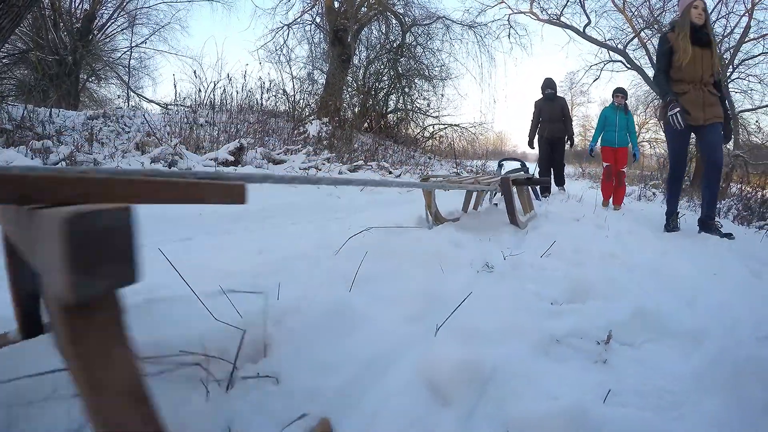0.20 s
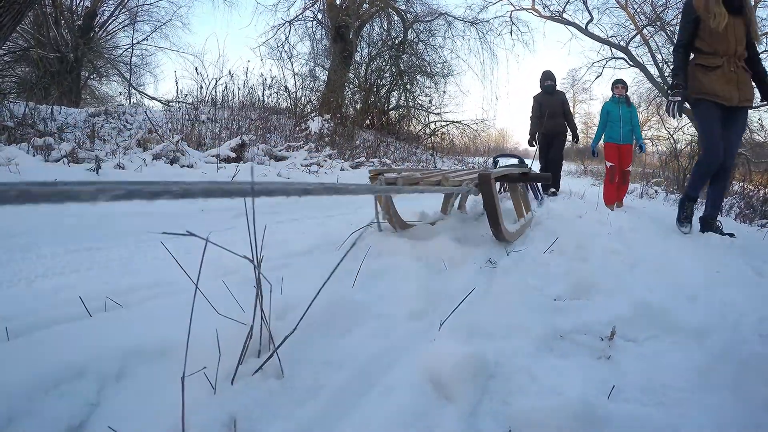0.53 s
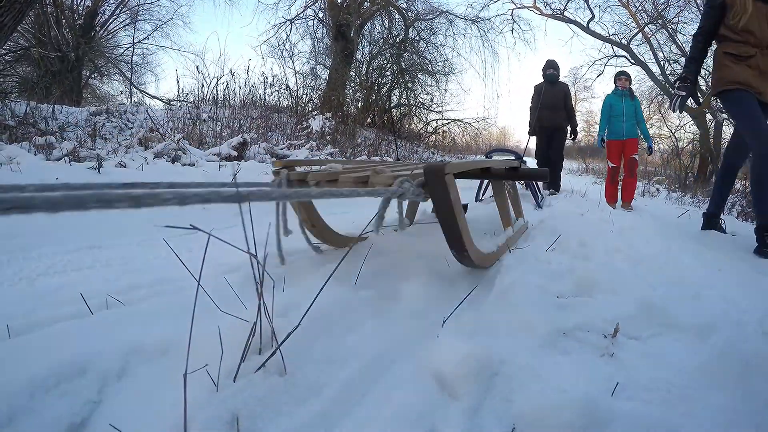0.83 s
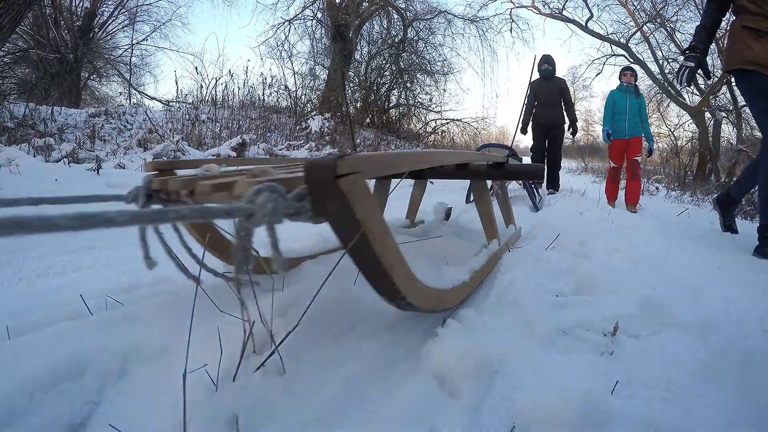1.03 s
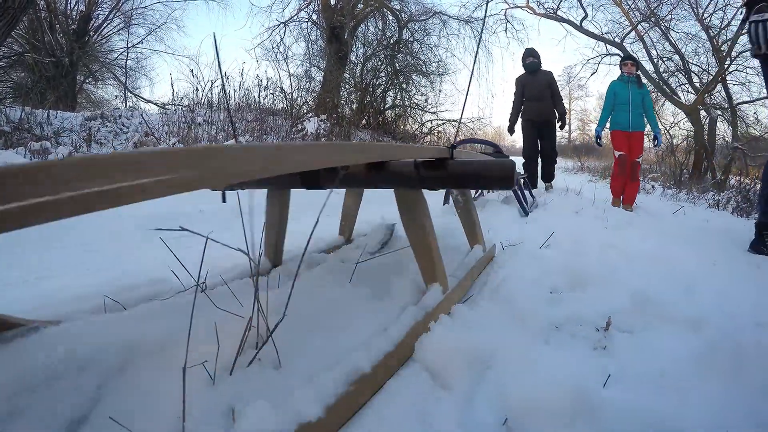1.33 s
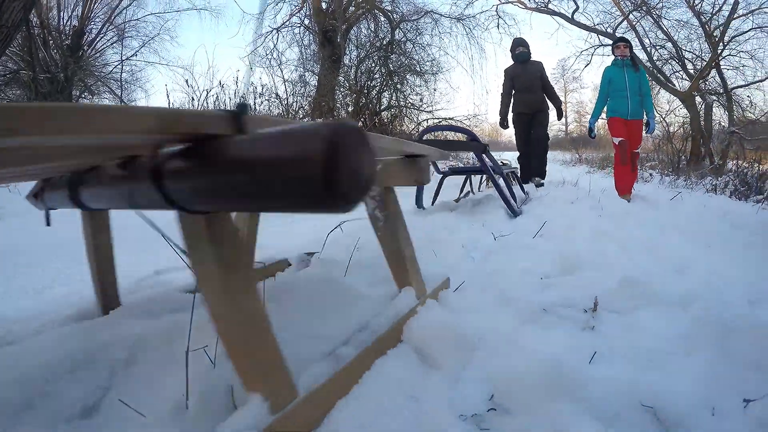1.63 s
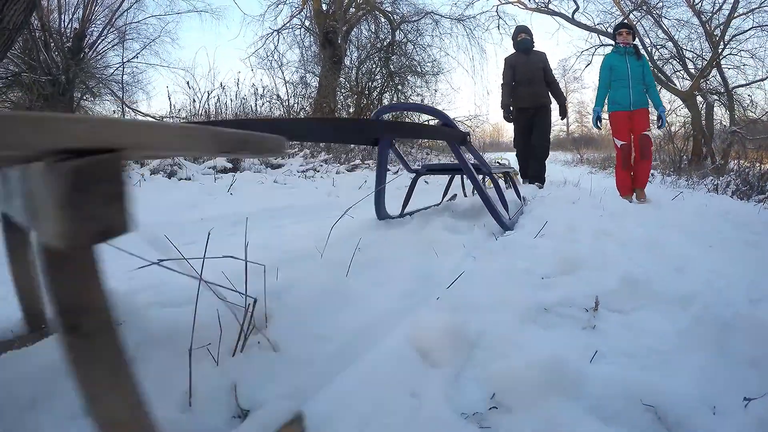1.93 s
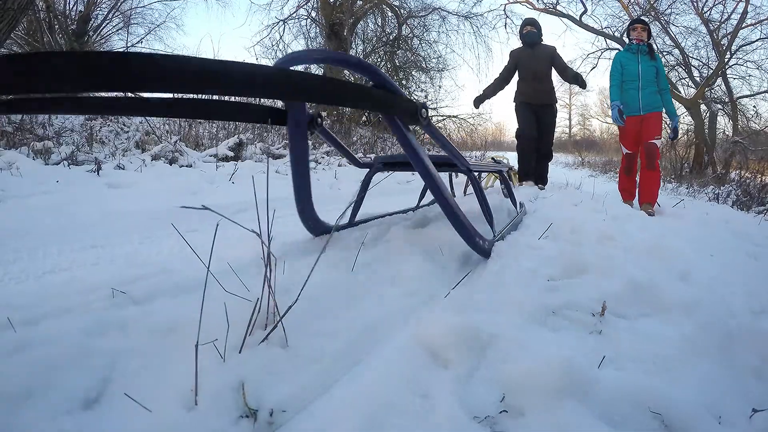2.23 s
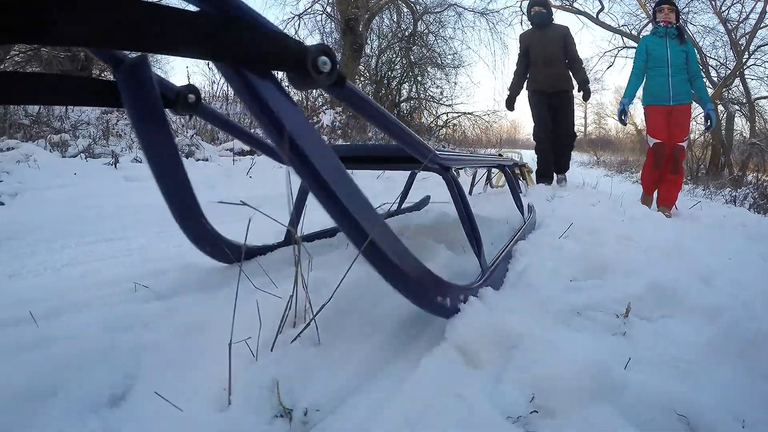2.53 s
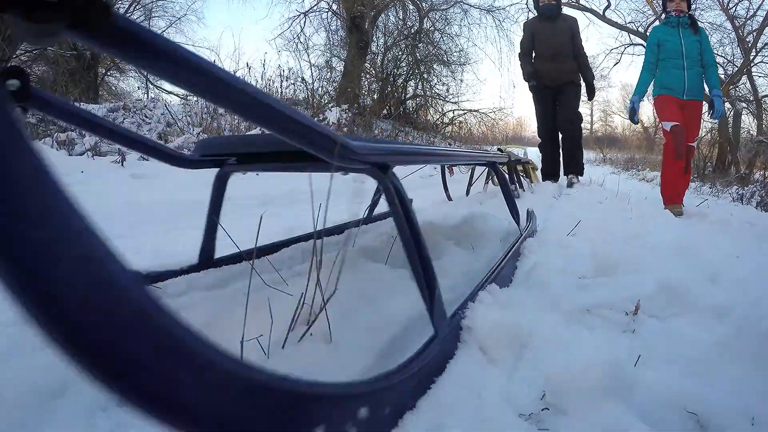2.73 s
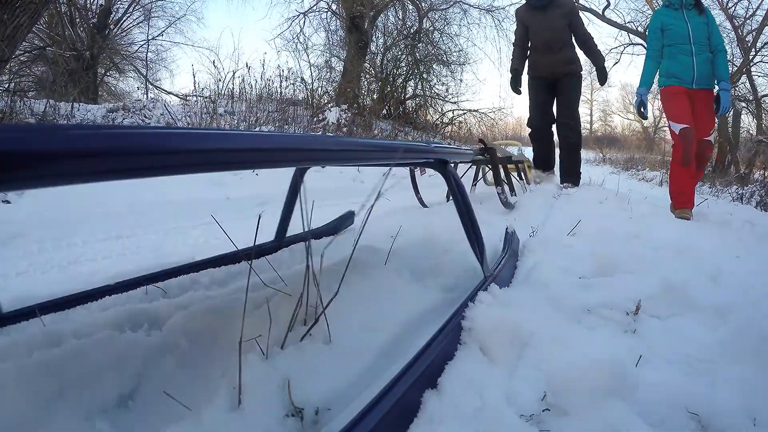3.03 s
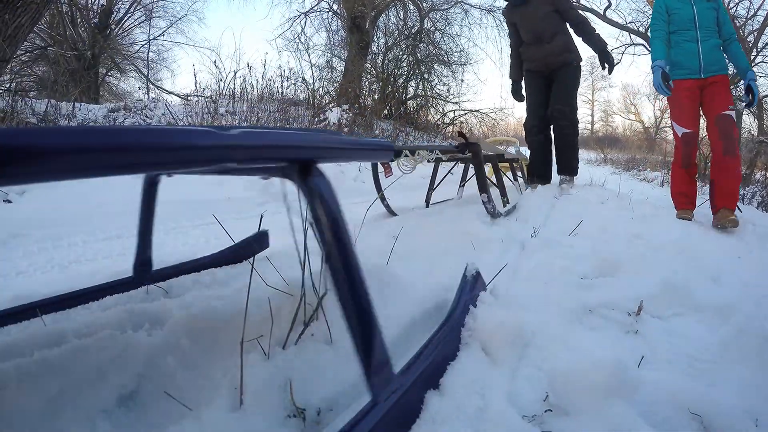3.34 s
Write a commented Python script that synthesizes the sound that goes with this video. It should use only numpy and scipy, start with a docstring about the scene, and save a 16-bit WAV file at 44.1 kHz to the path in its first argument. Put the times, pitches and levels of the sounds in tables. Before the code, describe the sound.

Sled runners scrape and crunch past over crusty snow, wooden then metal, with low thumping rumble

```python
"""A faint rumble and a soft snow hiss open the scene, then a wooden sled crunches by, followed by a metal one.
The runners crush the crust in surges of tiny filtered snaps, coloured by a housing lying in the snow beside them.
Their shudder and the rumble of the snow pack are low filtered snaps; lumps add short decaying bass swings.
Single cracks are fading bursts with pinging chips. Powder hisses under the runners, later under boots behind."""
import sys
import numpy as np
from scipy import signal
from scipy.fft import rfft, irfft, next_fast_len
from scipy.io import wavfile
from scipy.ndimage import uniform_filter1d, map_coordinates

SR = 44100
rng = np.random.default_rng(int(sys.argv[2]) if len(sys.argv) > 2 else 0)


def dump(signal):
    """Clip the signal to [-1, 1] and save it as 16-bit WAV at the path in sys.argv[1]."""
    limited = np.clip(np.atleast_2d(signal).T, -1, 1)
    pcm = np.round(limited * 32767).astype(np.int16)
    wavfile.write(sys.argv[1], SR, pcm)


N = 154350

# Drag of the wooden runners on the snow: time_s, level_db
WOOD_DRAG = [(0.0, -49), (0.136, -49.5), (0.198, -35.5), (0.218, -44), (0.386, -27.5), (0.428, -40),
             (0.46, -34.5), (0.5, -45.5), (0.518, -35.5), (0.612, -34.5), (0.648, -41.5), (0.754, -32),
             (0.932, -30.5), (1.014, -38), (1.065, -35), (1.085, -27), (1.16, -34), (1.208, -32.5),
             (1.234, -48), (1.285, -29), (1.45, -21.5), (1.58, -20.5), (1.78, -26), (1.796, -30),
             (1.852, -32.5), (1.88, -71)]
# Drag of the metal runners, carrying on from the wooden ones: time_s, level_db
METAL_DRAG = [(1.88, -51), (1.942, -40), (1.974, -42.5), (2.208, -29), (2.33, -35), (2.358, -31.5),
              (2.46, -29.5), (2.55, -33), (2.674, -49.5), (2.832, -31), (2.998, -34), (3.098, -47),
              (3.134, -34.5), (3.238, -32.5), (3.328, -54.5), (3.35, -43.5), (3.39, -55), (3.42, -50.5),
              (3.5, -74)]
# Tow rope slackens and the sled almost stops: centre_s, length_s, depth_db
STALLS = [(1.148, 0.027, -9.5), (1.877, 0.031, -19), (3.317, 0.037, -30)]
# Treble of the snapping crystals against the crunch: time_s, level_db
BRIGHTNESS = [(0, -14), (.2, -8.5), (.36, -8.5), (.9, -10.5), (1.2, -14), (1.5, -12.5), (1.66, -6.5),
              (1.85, -9.5), (1.97, -3), (2.12, -2), (2.18, -2.5), (2.32, -2), (2.45, -4), (2.58, -5),
              (3.5, -10)]
# Resonances of the housing: pitch_hz, width_hz, boost_db
HOUSING_RESONANCES = [(298, 26, 7.5), (496.8, 58, 16), (637.5, 30, 16.5), (987, 105, 11.5), (1199, 38, 5.5),
                      (1421, 42, 4), (1559, 47, 4.5), (3203, 130, 11), (3594, 71, 9), (6250, 790, 11),
                      (8140, 260, 9), (10700, 410, 12)]
# Crunch spectrum of the wooden runners: pitch_hz, relative_level_db (per Hz)
WOOD_CRUNCH_SPECTRUM = [(200, -21), (420, -42), (570, -13), (820, -4), (1100, -5.5), (1400, 2), (1690, 1.5),
                        (1850, -4.5), (2150, -3.5), (2650, -32), (5000, -31.5), (15000, -61)]
# Crunch spectrum of the front of the metal runners: pitch_hz, relative_level_db (per Hz)
METAL_FRONT_SPECTRUM = [(250, -8.5), (420, -23.5), (660, -9), (820, -5), (1280, -6), (1480, 4.5),
                        (1720, -0.5), (2020, 3.5), (2400, -7.5), (2800, -21), (6200, -27.5), (15000, -42)]
# Crunch spectrum of the rear of the metal runners: pitch_hz, relative_level_db (per Hz)
METAL_REAR_SPECTRUM = [(400, -17), (620, -19), (800, -5), (1050, -6), (1280, -5.5), (1500, 3.5),
                       (1720, -0.5), (2030, 6), (2450, -13), (4000, -24), (15000, -46.5)]
# Spectrum of the finer snow crystals snapping: pitch_hz, relative_level_db (per Hz)
CRYSTAL_SPECTRUM = [(800, -20.5), (2000, -4), (2450, 11), (2830, 3.5), (3400, 3.5), (4120, 6), (4900, -17),
                    (5600, -13), (7200, -22), (9300, -23.5), (15000, -37)]
# Shaking of the ground: time_s, rumble_level_db, shudder_level_db
GROUND_SHAKE = [(0.0, -40, -45), (0.09, -33, -43.5), (0.3, -36, -35.5), (0.38, -27, -29),
                (0.57, -30, -29.5), (0.66, -30, -29.5), (0.8, -26, -26), (1.12, -25, -28.5),
                (1.17, -30.5, -36), (1.32, -31.5, -26), (1.66, -17.5, -25), (1.7, -32.5, -31),
                (1.85, -26.5, -30), (1.89, -33.5, -45), (2.07, -30.5, -30), (2.23, -25, -34),
                (2.32, -29, -35), (2.5, -26, -31.5), (2.75, -41, -43.5), (2.85, -25, -31.5),
                (3.12, -36.5, -37), (3.16, -26.5, -30), (3.5, -46.5, -55.5)]
# Spectrum of the snow pack's rumble: pitch_hz, relative_level_db (per Hz)
RUMBLE_SPECTRUM = [(10, -49.5), (25, -9), (38, 1.5), (60, 3.5), (72, 7), (85, -8), (120, -9), (300, -73.5)]
# Spectrum of the runner shudder, as the wooden sled has it: pitch_hz, relative_level_db (per Hz)
SHUDDER_SPECTRUM = [(60, -38.5), (95, -18), (130, -3.5), (190, 1.5), (222, -3), (260, -16.5), (320, -18.5),
                    (410, -33), (900, -77.5)]
# Hiss of powder under the runners: time_s, level_db
POWDER_LEVEL = [(0, -52.5), (1.2, -54), (1.4, -48), (1.95, -49.5), (2.3, -61), (2.65, -50), (3.5, -52.5)]
# Spectrum of that powder hiss: pitch_hz, relative_level_db (per Hz)
POWDER_SPECTRUM = [(500, -2.5), (2900, 6.5), (4200, 1.5), (5500, -9), (7700, -8), (9000, -14.5),
                   (10200, -15), (12000, -17.5), (15000, -14)]
# Boots sliding through powder further off: time_s, level_db
BOOTS_LEVEL = [(2.3, -92), (2.72, -52.5), (3.1, -59.5), (3.3, -52), (3.5, -59)]
# Spectrum of the boots in powder: pitch_hz, relative_level_db (per Hz)
BOOTS_SPECTRUM = [(500, -41), (2200, -5), (2850, 8.5), (3500, 0.5), (5200, -11), (6700, -8), (7650, -4),
                  (8800, -17.5), (15000, -26)]
# Single breaks of the crust: start_s, level_db, decay_s
CRACKS = [(0.112, -30, 0.0066), (0.199, -34, 0.0045), (1.075, -36, 0.0096), (1.771, -24, 0.0051),
          (2.162, -17, 0.0051), (2.171, -30, 0.006), (2.186, -16.5, 0.009), (2.205, -27, 0.0063),
          (2.234, -22, .009), (2.413, -21.5, 0.006), (3.115, -39, 0.0055), (3.372, -29, 0.0036),
          (3.448, -32.5, 0.0037)]
# Spectrum of the breaking crust: pitch_hz, relative_level_db (per Hz)
CRACK_SPECTRUM = [(100, 19.5), (420, -9), (900, 0), (1700, 9.5), (2700, 0.5), (3500, -9), (5000, -14.5),
                  (6300, -15), (8000, -32), (15000, -26)]
# Runners dropping over lumps: start_s, envelope_peak_db
BUMPS = [(0.47, -15), (0.749, -10.5), (0.962, -13), (1.125, -18.5), (1.384, -13.5), (1.52, -12.5),
         (1.629, -7), (2.147, -17), (2.22, -12.5), (2.545, -17)]

# Layer trims in dB, on top of the level tables
WOOD_DB, METAL_DB, CRYSTAL_DB, RUMBLE_DB, SHUDDER_DB = -1.5, 2, -3, 3.5, 0.5
SIDE_SCATTER_DB, SIDE_AIR_DB = -34, -72.5
GRAINS_PER_S, GRAIN_SPREAD_DB = 7500, 2
METAL_START_S = METAL_DRAG[0][0]
REAR_START_S = 2.67  # the rear of the metal sled takes over
SLIPS_PER_S = 220  # at the rms drag
SLIP_DECAY_S = 0.0035
SLIP_GAIN = 2 * 10 ** (-6.5 / 20)  # strongest single jerk against the steady grinding
WANDER_SHARE = 0.0121  # rms drift of pitch before centring, as a fraction
SURGE_EXPONENT = 0.85  # how closely the shudder follows the surges of the drag
METAL_PITCH_RATIO = 0.92  # the metal sled shudders lower than the wooden one
CHIP_HZ, CHIP_RING_S = 3280, 0.00063  # middle pitch, time to the ping's peak
CHIP_DB = -0.5  # mid-sized chip against its crack, before the brightness curve
BUMP_HZ, BUMP_DECAY_S, BUMP_RISE_S = 59.8, 0.019, 0.029
LOW_CUT_HZ, TOP_HZ = 8.6, 15300


def undb(db):
    """Decibels to gain."""
    return 10 ** (np.asarray(db) / 20)


def unit(x):
    """Scale to rms 1."""
    return x / np.sqrt(np.mean(x ** 2))


def curve(rows, axis=1):
    """Gain over time, from one dB column of a table."""
    rows = np.array(rows)
    return undb(np.interp(np.arange(N) / SR, rows[:, 0], rows[:, axis]))


def walk(rate_hz):
    """Smooth random wander with rms 1."""
    span = max(2, int(SR / rate_hz))
    smooth = uniform_filter1d(rng.standard_normal(N), span)
    return unit(uniform_filter1d(smooth, span))


def colour(x, spectrum, housing=True):
    """Causal filter with a given spectrum, plus housing resonances if wanted; keeps the power of white noise."""
    size = 2 * next_fast_len(N)
    hz = np.arange(size // 2 + 1) * SR / size
    points = np.array(spectrum)
    db = np.interp(np.log(hz + 1), np.log(points[:, 0]), points[:, 1])
    if housing:
        for centre, width, boost in HOUSING_RESONANCES:
            db = db + boost / (1 + (2 * (hz - centre) / width) ** 2)
    # Folding the cepstrum forward gives minimum phase, so nothing rings early
    cepstrum = irfft(np.log(unit(undb(db))))
    cepstrum[1:size // 2] *= 2
    cepstrum[size // 2 + 1:] = 0
    return irfft(rfft(x, size) * np.exp(rfft(cepstrum)))[:N]


def steady(x, span_s):
    """Even out swells slower than about the span, leaving rms near 1."""
    power = uniform_filter1d(x ** 2, int(span_s * SR) + 1)
    power = uniform_filter1d(power, int(span_s * SR / 2) + 1)
    return x / np.sqrt(power + 1e-12)


def fractures(rate, spread_db):
    """Tiny snaps at random moments, either polarity; any size spread gives many weak and few strong."""
    size = undb(spread_db * np.minimum(rng.exponential(size=N), 5))
    snaps = rng.random(N) < rate / SR
    return unit(snaps * size * rng.choice([-1, 1], N))


def stalls():
    """Drag falls away briefly each time the rope slackens and the sled almost stops."""
    t = np.arange(N) / SR
    dip_db = sum(depth * np.exp(-(2 * (t - centre) / length) ** 4) for centre, length, depth in STALLS)
    return undb(dip_db)


def drag():
    """Force of the runners on the snow over time, wooden sled then metal."""
    return curve(list(WOOD_DRAG) + list(METAL_DRAG)) * stalls()


def slips():
    """Runners stick, then slip in sharp, decaying jerks over steady grinding; hard drag crowds them together."""
    rate = SLIPS_PER_S * np.sqrt(unit(drag()))
    kicks = (rng.random(N) < rate / SR) * rng.random(N)
    jerks = signal.lfilter([1], [1, -np.exp(-1 / (SLIP_DECAY_S * SR))], kicks)
    return steady(1 + SLIP_GAIN * jerks, 0.069)


def wander(x, share):
    """Rocking runners shift the ring of the scrape: a gentle time warp drifts all its pitches together."""
    drift = share * walk(11.1)
    centred = drift - uniform_filter1d(drift, SR // 2)
    return map_coordinates(x, [np.arange(N) + np.cumsum(centred)], mode="nearest")


def runners():
    """Each runner in turn crushes the crust, with finer crystals snapping in the same jerks."""
    force = drag() * slips()
    crush = steady(fractures(GRAINS_PER_S, GRAIN_SPREAD_DB), 0.0053) * force
    fine = steady(fractures(rate=4200, spread_db=2.0), 0.02) * force * curve(BRIGHTNESS)
    t = np.arange(N) / SR
    wood, rear = t < METAL_START_S, t > REAR_START_S
    front = ~(wood | rear)
    wood_scrape = colour(crush * wood, WOOD_CRUNCH_SPECTRUM)
    metal_scrape = colour(crush * front, METAL_FRONT_SPECTRUM) + colour(crush * rear, METAL_REAR_SPECTRUM)
    scrape = undb(WOOD_DB) * wood_scrape + undb(METAL_DB) * metal_scrape
    crystals = undb(CRYSTAL_DB) * colour(fine, CRYSTAL_SPECTRUM)
    return wander(scrape + crystals, WANDER_SHARE)


def ground():
    """The snow pack rumbles, and the runners shudder with each surge as the snow gives way in steps."""
    rumble = steady(colour(fractures(rate=540, spread_db=3.0), RUMBLE_SPECTRUM, housing=False), 0.067)
    force = drag()
    surge = (force / uniform_filter1d(force, int(.2 * SR))) ** SURGE_EXPONENT
    steps = steady(fractures(rate=510, spread_db=2.5), 0.048) * surge * curve(GROUND_SHAKE, axis=2)
    wood = np.arange(N) / SR < METAL_START_S
    metal_spectrum = np.array(SHUDDER_SPECTRUM) * [METAL_PITCH_RATIO, 1]
    shudder = colour(steps * wood, SHUDDER_SPECTRUM) + colour(steps * ~wood, metal_spectrum)
    return undb(RUMBLE_DB) * rumble * curve(GROUND_SHAKE, axis=1) + undb(SHUDDER_DB) * shudder


def loose_snow():
    """Dense tiny snaps with a wandering level: powder hissing under the runners, later under boots behind."""
    powder_grains = fractures(rate=12000, spread_db=2.0) * undb(1.4 * walk(25))
    boot_grains = fractures(rate=12000, spread_db=2.0) * undb(6.2 * walk(28))
    powder = colour(powder_grains, POWDER_SPECTRUM, housing=False)
    boots = colour(boot_grains, BOOTS_SPECTRUM, housing=False)
    return powder * curve(POWDER_LEVEL) + boots * curve(BOOTS_LEVEL)


def cracks():
    """A piece of crust breaks in a short, fading burst of equal-sized snaps."""
    t = np.arange(N) / SR
    burst = np.zeros(N)
    for start, db, decay in CRACKS:
        burst += undb(db) * (t >= start) * np.exp(-np.abs(t - start) / decay)
    return colour(burst * steady(fractures(rate=2600, spread_db=0), 0.02), CRACK_SPECTRUM)


def chips():
    """Each break throws off four icy chips, each a brief sine ping that is louder when the treble is up."""
    out, bright, age = np.zeros(N), curve(BRIGHTNESS), np.arange(SR // 20) / SR
    envelope = age / CHIP_RING_S * np.exp(1 - age / CHIP_RING_S)  # peaks at 1
    for start, db, decay in CRACKS:
        for late, pitch, size in rng.random(size=(4, 3)):
            at = int((start + 2 * decay * late) * SR)
            hz = CHIP_HZ * 2 ** ((pitch - .5) / 2)  # up to a quarter octave either way
            ping = np.sin(2 * np.pi * hz * age) * envelope
            out[at:at + len(age)] += undb(db + CHIP_DB) * bright[at] * (.5 + size) * ping[:N - at]
    return out


def bumps():
    """Each lump sets the housing bouncing on the snow: a low sine that swells and dies in a few cycles."""
    out = np.zeros(N)
    for start, db in BUMPS:
        age = np.maximum(np.arange(N) / SR - start, 0)
        swing = (1 - np.exp(-age / BUMP_RISE_S)) * np.exp(-age / BUMP_DECAY_S)
        out -= undb(db) * swing / swing.max() * np.sin(2 * np.pi * BUMP_HZ * age)
    return out


def scene():
    """Nearly the same in both ears; only a little scattered scraping and a faint hiss differ."""
    mid = runners() + ground() + loose_snow() + cracks() + chips() + bumps()
    # Side spectra: pitch_hz, relative_level_db (per Hz)
    scatter_spectrum = [(150, -5), (400, -1), (1400, 21.5), (5000, 3.5), (15000, -17)]
    scatter = colour(rng.standard_normal(N) * drag(), scatter_spectrum, housing=False)
    air = colour(rng.standard_normal(N), [(100, 19), (15000, -6)], housing=False)
    side = undb(SIDE_SCATTER_DB) * scatter + undb(SIDE_AIR_DB) * air
    return np.array([mid + side, mid - side])


def record(dry):
    """The pickup loses the deepest bass gently and the top steeply."""
    low_cut = signal.butter(1, LOW_CUT_HZ, "high", fs=SR, output="sos")
    top_cut = signal.ellip(10, .2, 80, TOP_HZ, fs=SR, output="sos")
    return signal.sosfilt(top_cut, signal.sosfilt(low_cut, dry))


dry = scene()
out = record(dry)
dump(out)
```